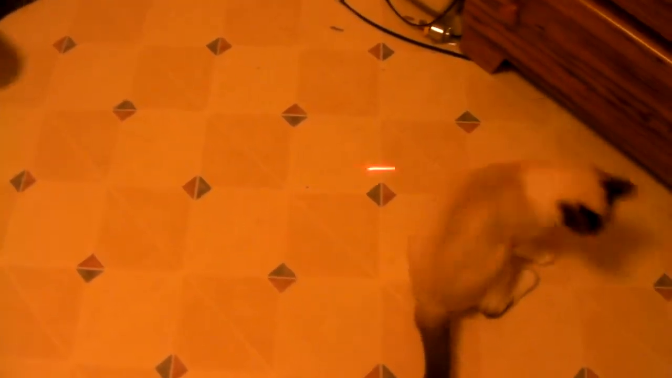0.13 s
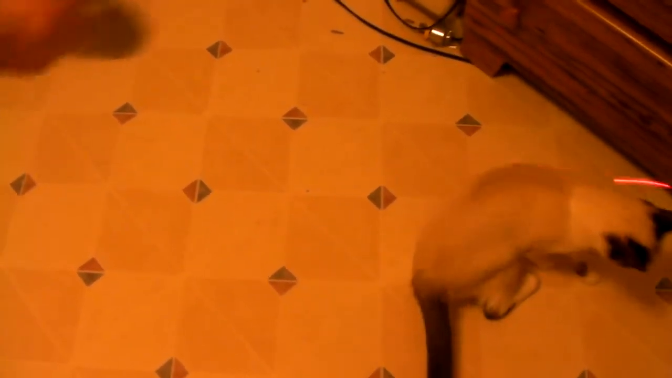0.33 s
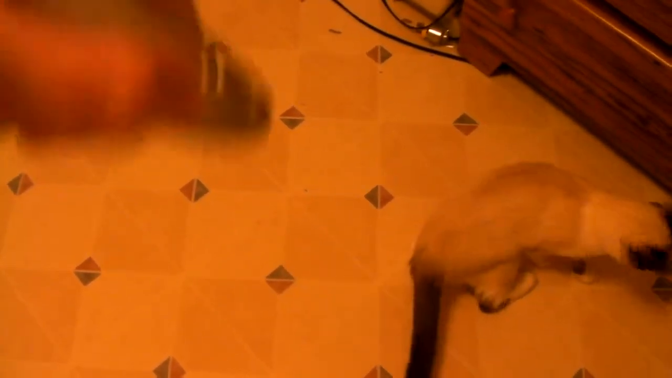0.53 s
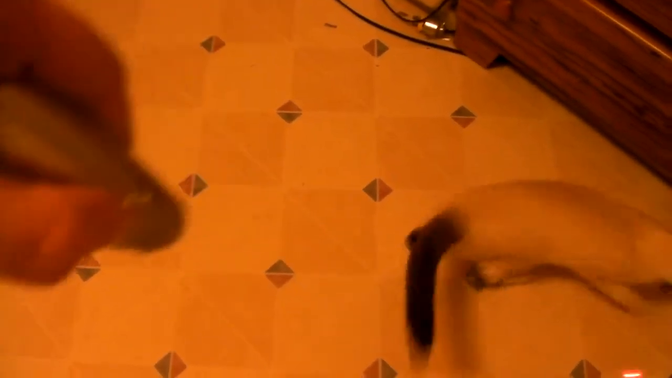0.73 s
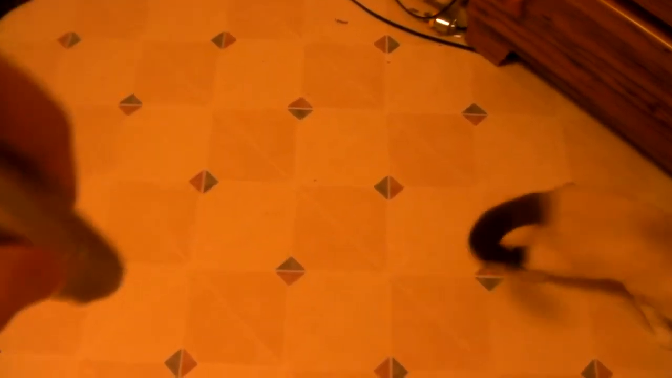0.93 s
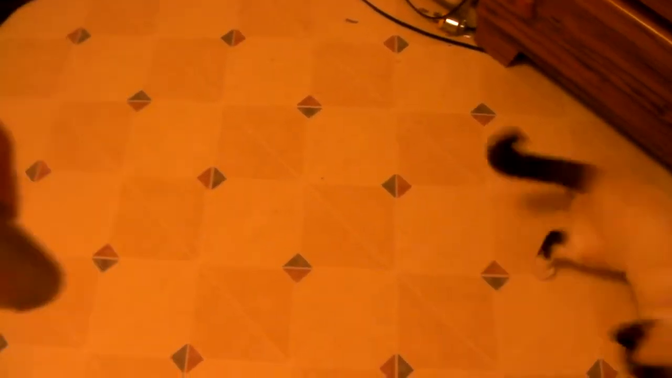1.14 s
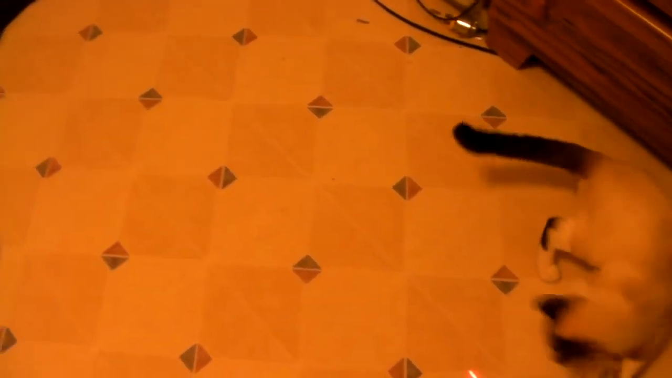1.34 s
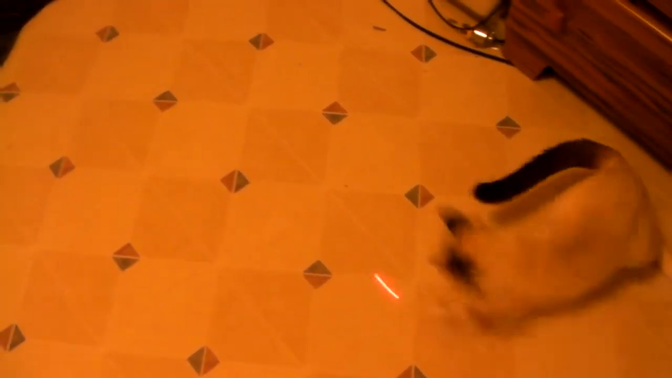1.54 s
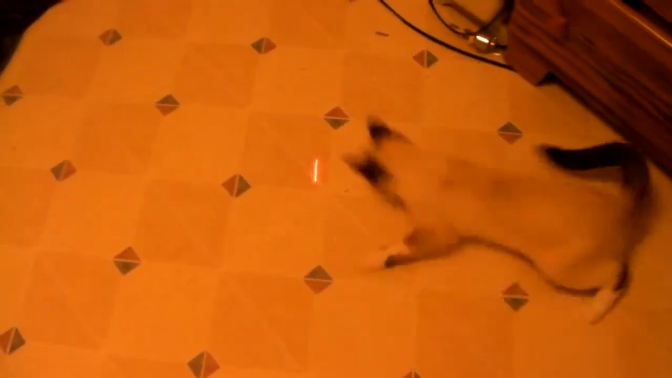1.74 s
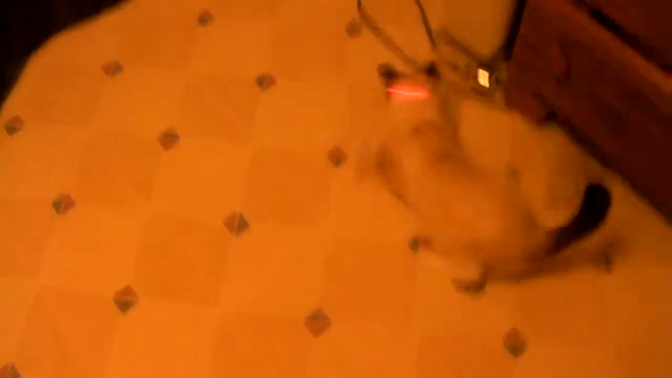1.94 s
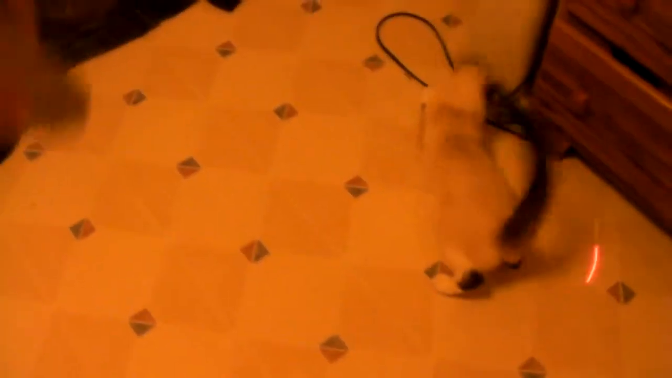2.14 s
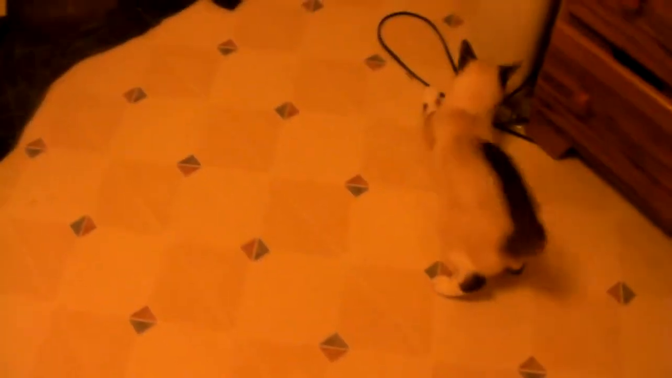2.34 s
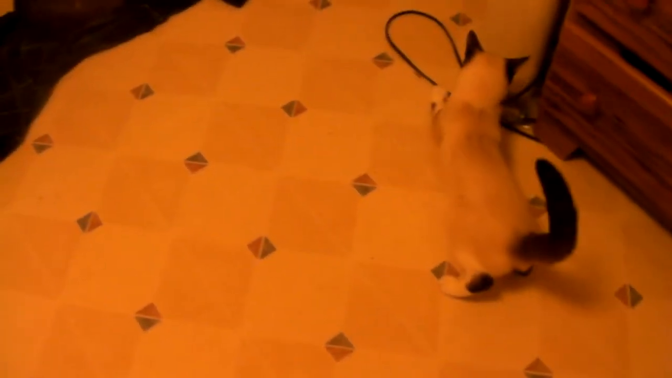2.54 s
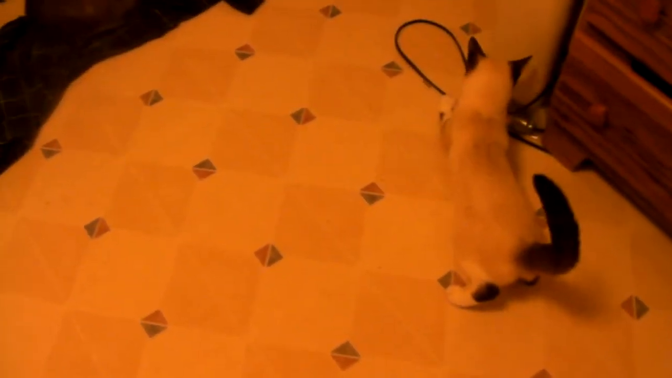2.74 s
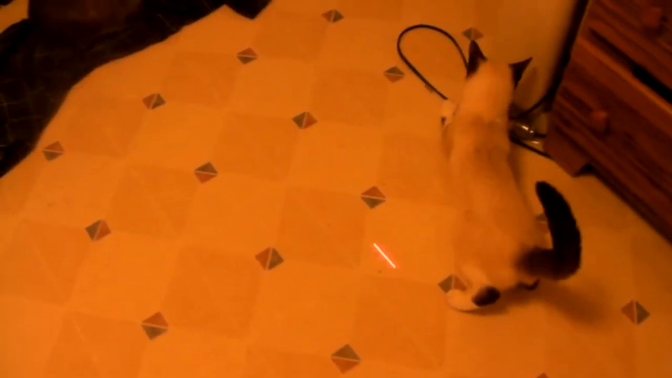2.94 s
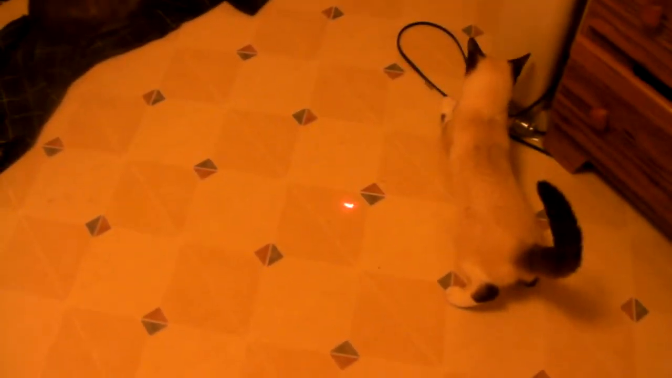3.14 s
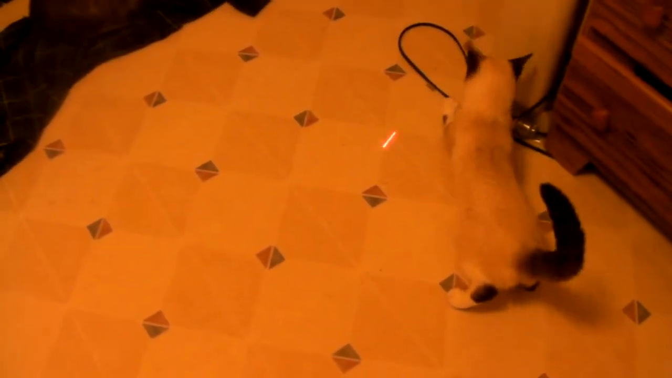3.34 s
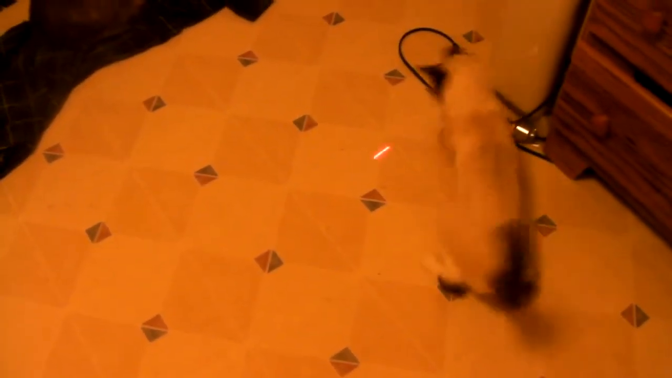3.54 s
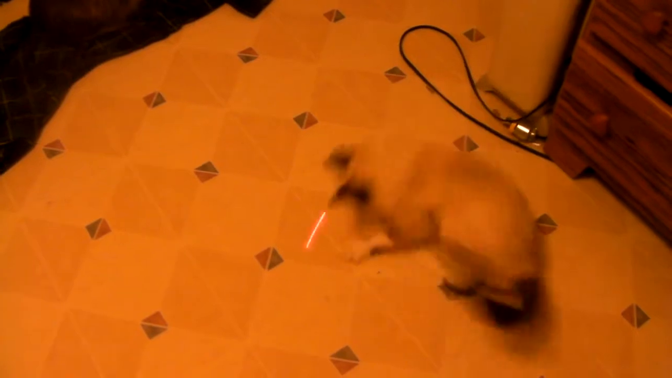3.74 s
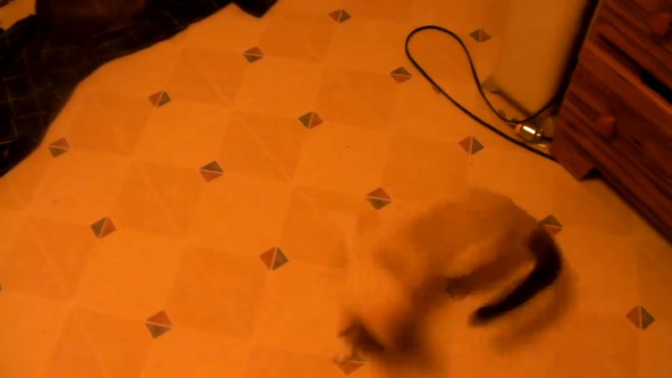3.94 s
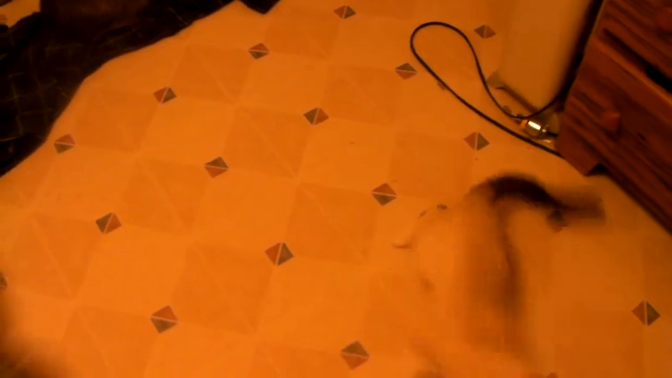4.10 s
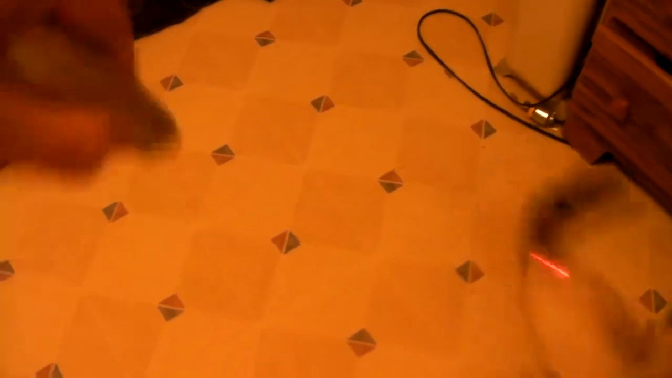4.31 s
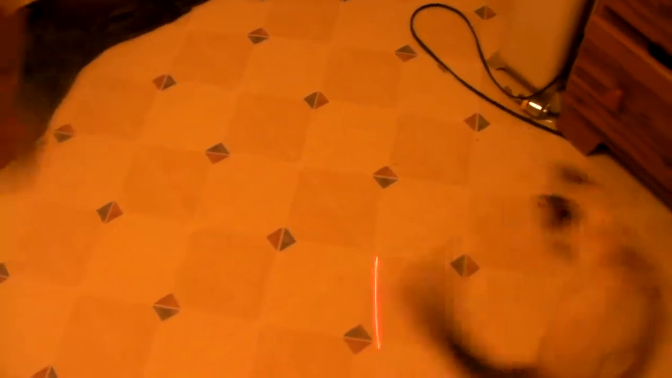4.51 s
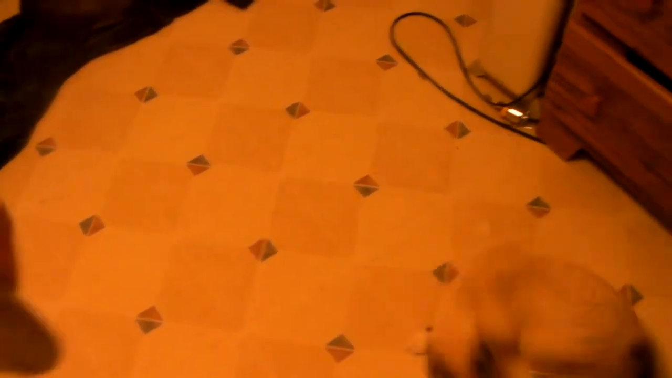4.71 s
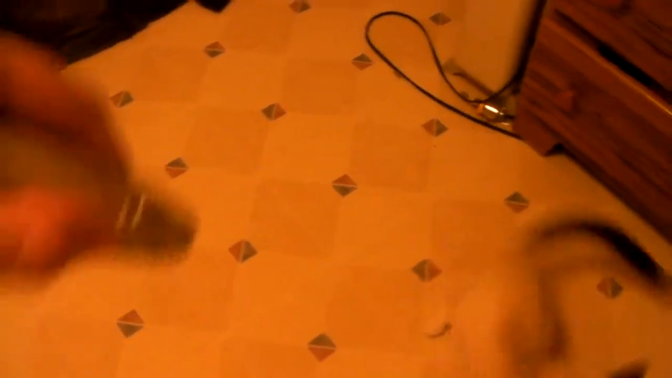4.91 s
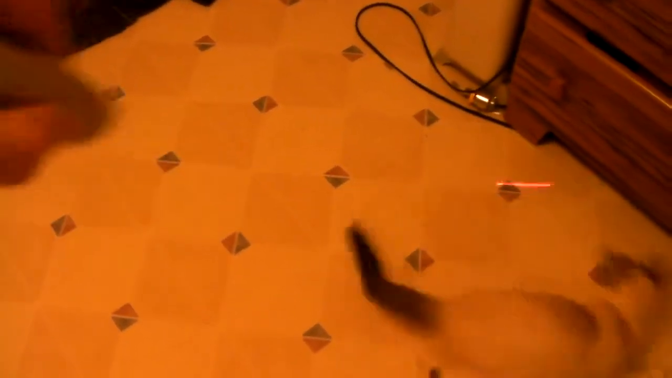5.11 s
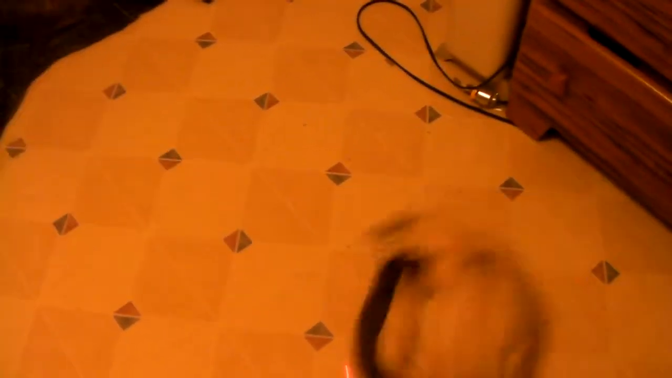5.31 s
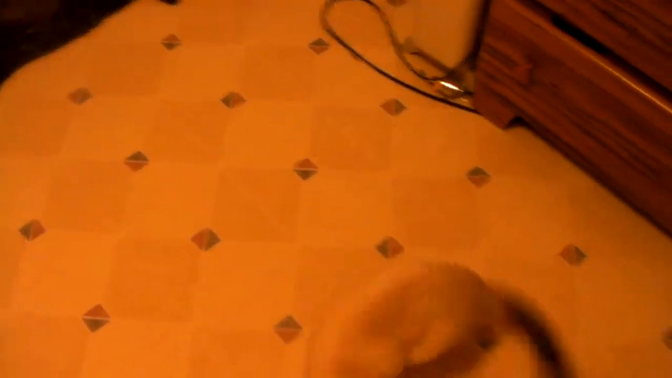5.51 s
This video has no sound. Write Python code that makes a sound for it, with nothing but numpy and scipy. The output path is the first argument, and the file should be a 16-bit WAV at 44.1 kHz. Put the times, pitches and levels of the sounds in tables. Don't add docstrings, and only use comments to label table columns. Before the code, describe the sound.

Close stereo pickup in a small indoor room with low rumble and light hiss. Barely audible kitten steps come first, then a quick burst of sharp claw clicks, short skids and wooden thuds. A quieter pause with faint pads follows, before a longer, busier scramble of ticking, scraping and thumping continues to the end.

```python
import sys
import numpy as np
from scipy import signal
from scipy.fft import rfft, irfft, next_fast_len
from scipy.io import wavfile
from scipy.ndimage import uniform_filter1d

SR = 44100
rng = np.random.default_rng(int(sys.argv[2]) if len(sys.argv) > 2 else 0)


def unload_audio(sound):
    columns = np.transpose(np.atleast_2d(sound))
    steps = np.round(np.clip(columns, -1, 1) * 32767)
    wavfile.write(sys.argv[1], SR, steps.astype(np.int16))


def volts_from_db(level):
    exponent = np.asarray(level, float) / 20
    return 10 ** exponent


N = 245195


def evened(x):
    return x / np.sqrt(np.mean(x ** 2) + 1e-20)


def read(points, hz):
    f, value = np.transpose(points)
    return np.interp(np.log(hz + 1), np.log(f + 1), value)


def add(mix, s, sound):
    part = mix[..., round(s * SR):][..., :sound.shape[-1]]
    part += sound[..., :part.shape[-1]]


def coloured(x, gain):
    size = next_fast_len(x.shape[-1] // 2 + 1) * 2
    spectrum = rfft(x, size) * gain(np.fft.rfftfreq(size, 1 / SR))
    return irfft(spectrum, size)[..., :x.shape[-1]]


def paired(two, likeness):
    same = lambda hz: np.clip(read(likeness, hz), 0, 1)
    shared = coloured(two[0], same)
    own = coloured(two[1], lambda hz: np.sqrt(1 - same(hz) ** 2))
    return np.array([two[0], shared + own])


def stir():
    rest_db, lag_s, share_db = -1.5, 0.043, 40
    t = np.arange(0, N / SR, .005)
    landings = np.array(LANDINGS)
    late = np.maximum(t - landings[:, :1], 0) / lag_s
    swells = volts_from_db(landings[:, 1:2] + share_db) * late * np.exp(1 - late)
    return np.interp(np.arange(N) / SR, t, volts_from_db(rest_db) + swells.sum(0))


# [f/Hz, level/dB per Hz]
AIR_COLOUR = [(12, -62), (20, -19), (43, -17.5), (63, -7.5), (117, -5), (273, -10.5), (404, -3.5),
              (440, -3), (1020, -14.5), (1510, -14.5), (1740, -19), (2440, -19.5), (2810, -19.5),
              (13600, -25), (16500, -24)]
# [f/Hz, likeness]
AIR_LIKENESS = [(60, 0.53), (180, 0.4), (550, 0.56), (1650, 0.28), (4970, -0.49), (15000, 0.16)]
# [f/Hz, width/Hz, level/dB]
HUMS = [
    (404, 39, -82),
    (1462, 4.3, -85),
    (2443, 61, -85.5),
]
# [t/s, level/dB]
WHINE_SWELL = [
    (0, 1.5),
    (.88, 1.5),
    (.94, 12),
    (1.0, 6),
    (1.05, 18),
    (1.1, 0),
    (1.4, 5),
    (5.56, 6),
]


def air():
    noise = paired(rng.standard_normal((2, N)), AIR_LIKENESS)
    low = lambda hz: 1 / (1 + (hz / 1100) ** 4)
    shape = lambda hz: volts_from_db(read(AIR_COLOUR, hz))
    scale = volts_from_db(-63) / np.sqrt(np.mean(coloured(noise, shape) ** 2))
    wander = uniform_filter1d(uniform_filter1d(rng.standard_normal(N), 1500), 1500)
    drift = stir() * volts_from_db(1.8 * evened(wander))
    rumble = drift * coloured(noise, lambda hz: shape(hz) * low(hz))
    hiss = coloured(noise, lambda hz: shape(hz) * (1 - low(hz)))
    out = scale * (rumble + hiss)
    swell = volts_from_db(np.interp(np.arange(N) / SR, *np.transpose(WHINE_SWELL)))
    for (centre, width, db), slow in zip(HUMS, [1, 1, swell]):
        hum = coloured(noise, lambda hz: 1 / (1 + (2 * (hz - centre) / width) ** 2))
        out += volts_from_db(db) * slow * evened(hum)
    return out


# [f/Hz, t60/s]
ROOM_DECAY = [(300, 0.1), (790, 0.55), (2090, 0.21), (5510, 0.19), (14600, 0.24)]
# [t/s, level/dB]
ECHOES = [
    (.0019, -18),
    (.0043, -12.5),
    (.0068, -11.5),
    (0.0148, -22),
    (0.0144, -12),
    (.021, -15),
]
# [f/Hz, likeness]
ROOM_LIKENESS = [(200, 0.89), (2000, 0.84), (5000, 0.66), (10000, 0.12)]


def tail(build_s=0.00084):
    taps = np.zeros((2, 22050))
    at = np.arange(80, 22000, 20) + rng.integers(0, 20, (2, 1096))
    np.put_along_axis(taps, at, rng.choice([-1., 1.], at.shape), 1)
    hz, t, z = signal.stft(paired(taps, ROOM_LIKENESS), SR, nperseg=256)
    decay = volts_from_db(-60 * t / read(ROOM_DECAY, hz)[:, None])
    late = signal.istft(z * decay, SR, nperseg=256)[1]
    late *= 1 - np.exp(-np.arange(late.shape[1]) / SR / build_s)
    late *= volts_from_db(-2.5) / np.linalg.norm(late[0])
    for (s, db), (shift, sign) in zip(ECHOES, rng.random((len(ECHOES), 2))):
        late[:, round(s * SR * (.85 + .3 * shift))] += volts_from_db(db) * np.sign(sign - .5)
    return late


# [t/s, level/dB, lead-in/s, slide/s]
SKIDS = [(1.45, -56.5, .02, 0.05), (1.636, -52, 0.1, .12), (1.742, -35.5, 0.032, .14),
         (1.87, -32.5, 0.018, 0.092), (1.925, -38.5, 0.012, 0.069), (2.018, -31, 0.022, .1),
         (3.64, -53.5, 0.058, .2), (3.8, -53, 0.41, 0.087), (3.841, -32.5, 0.016, 0.065),
         (3.9, -44.5, 0.028, 0.16), (4.05, -47, 0.052, 0.11), (4.101, -36, .022, 0.087),
         (4.331, -29.5, 0.018, 0.027), (4.361, -33, .008, 0.083), (4.632, -33.5, 0.033, .07),
         (4.7, -51.5, .05, 0.12), (4.91, -40.5, .03, 0.16), (4.89, -52, 0.18, 0.11),
         (5.05, -55, 0.14, 0.39), (5.11, -47, 0.085, .04), (5.26, -38.5, 0.016, 0.037),
         (5.44, -40, 0.19, 0.12), (5.55, -44.5, 0.14, 0.2)]
# [f/Hz, level/dB per Hz]
SKID_COLOUR = [(410, -31), (700, -16.5), (1370, -6.5), (3240, -4.5), (4950, -3.5), (8630, -10),
               (15000, -19), (15900, -28), (16500, -59)]


def skids(per_s=5000, spread_db=4.5):
    t = np.arange(0, N / SR, .001)
    level = np.zeros(len(t))
    for s, db, lead, slide in SKIDS:
        away = np.maximum((s - t) / lead, (t - s) / slide)
        level = np.maximum(level, volts_from_db(db - 20 * away))
    size = volts_from_db(spread_db * np.minimum(rng.exponential(1, (2, N)), 4))
    slips = size * (rng.random((2, N)) < per_s / SR) * rng.choice([-1, 1], (2, N))
    scrape = coloured(paired(slips, ROOM_LIKENESS), lambda hz: volts_from_db(read(SKID_COLOUR, hz)))
    return volts_from_db(-5) * evened(scrape) * np.interp(np.arange(N) / SR, t, level)


def ringing(main_hz, fixed_hz, fixed_db, crowd, t60, travel, dull_db, luck):
    t = np.arange(11000) / SR
    place, weight, phase = luck.T[:, :, None]
    step = (np.arange(len(luck))[:, None] + place) / len(luck)
    hz = crowd[0][0] * (crowd[-1][0] / crowd[0][0]) ** step
    db = read(crowd, hz) + 4.9 * (weight - .5) - dull_db * np.log2(np.maximum(hz / 600, 1))
    hz[0], db[0] = main_hz, 0
    hz[1], db[1] = fixed_hz * (0.95 + 0.0678 * place[1]), fixed_db
    rise = (1 - np.exp(-t * hz / travel)) ** 2
    fade_db = 60 * t / t60 * (hz / fixed_hz) ** 0.12
    modes = volts_from_db(db - fade_db) * rise * np.sin(2 * np.pi * (hz * t + phase))
    sound = modes.sum(0)
    return sound / abs(sound).max()


# [f/Hz, level/dB]
JOISTS = [(32, -11), (60, -14.5), (130, -8.5), (200, -5), (270, -8)]
# [f/Hz, level/dB]
BOARDS = [(245, -14.5), (350, -8), (530, -9), (750, -19), (1200, -15), (1700, -17)]
# [t/s, joist level/dB, joist f/Hz, board f/Hz, board level/dB]
LANDINGS = [(1.447, -50.5, 85.5, 557, -50.5), (1.731, -35, 200, 435, -40), (1.788, -39.5, 113, 383.7, -43),
            (1.865, -35, 187.6, 404, -42.5), (2.011, -34.5, 272, 396.8, -26.5), (2.048, -42, 218, 390, -36),
            (3.832, -37, 175.5, 388, -47), (3.864, -65, 111, 373.5, -45), (3.912, -41.5, 87, 462, -49),
            (4.029, -38, 199, 338, -64), (4.099, -52, 180, 426, -47.5), (4.162, -48, 99, 561, -51),
            (4.269, -54, 102, 403.5, -44), (4.325, -36, 265, 328.7, -39), (4.348, -38, 207, 394, -38.5),
            (4.625, -30.5, 204, 405, -37.5), (4.685, -44, 92, 482, -45), (4.719, -55, 95, 381, -44.5),
            (4.794, -45, 152, 397, -55), (4.908, -40, 204, 348.4, -39), (5.124, -41.5, 172, 318, -48),
            (5.26, -46, 87, 397.6, -46), (5.418, -32.5, 182, 453, -39), (5.508, -45, 112, 372, -44)]
# [t/s, joist level/dB, joist f/Hz, board level/dB]
STEPS = [(0.07, -54.5, 154, -82), (0.299, -80, 99, -78), (0.699, -63.5, 215, -62.5), (0.759, -65, 156, -83),
         (0.87, -62, 113, -76), (1.013, -68, 127, -67), (1.268, -60, 190, -82), (1.378, -74, 100, -68),
         (1.489, -53, 91, -65), (1.549, -69, 66, -75), (1.597, -52.5, 168, -75), (1.686, -51, 151, -60.5),
         (1.937, -38, 110, -62), (2.234, -57.5, 179, -81), (2.29, -64, 135, -67), (2.547, -58, 106, -71.5),
         (2.727, -61, 104, -69), (3.022, -75, 107, -69), (3.399, -63, 82.8, -60), (3.53, -56, 177, -62.5),
         (3.621, -64, 144, -64), (3.69, -58, 88, -65.5), (3.761, -41, 94.5, -58), (4.439, -54, 205, -69),
         (5.002, -55, 142, -56.5), (5.199, -53, 107, -65), (5.36, -49, 92.6, -57)]


def paws():
    joist_mode_hz, board_mode_hz = 100, 391
    landing_ring, step_ring, step_board_hz = 0.82, 1, 411.4
    thuds = [(*row, landing_ring) for row in LANDINGS]
    thuds += [(s, db, hz, step_board_hz, board_db, step_ring) for s, db, hz, board_db in STEPS]
    out, luck = np.zeros(N), rng.random((len(thuds), 24, 3))
    for (s, db, joist_hz, board_hz, board_db, ring), draw in zip(sorted(thuds), luck):
        dull_db = max(0.38 * (-24.5 - board_db), 0)
        joist = ringing(joist_hz, joist_mode_hz, -5.5, JOISTS, 0.26 * ring, 0.38, 0, draw[:8])
        board = ringing(board_hz, board_mode_hz, -0.5, BOARDS, 0.28 * ring, 0.96, dull_db, draw[8:])
        add(out, s, volts_from_db(db - 0.5) * joist)
        add(out, s, volts_from_db(board_db + 5.5) * board)
    wet = signal.fftconvolve(out[None], tail(), axes=1)[:, :N]
    return out + volts_from_db(-13) * wet


def tick(db, hz, bright_db, cycles=0.9):
    t = np.arange(160) / SR
    ring = np.sin(2 * np.pi * hz * t) * (t * hz) ** 1.35 * np.exp(-t * hz / cycles * 1.86)
    for _ in range(2):
        ring = ring - uniform_filter1d(ring, size=21, mode="constant")
    ring = ring / abs(ring).max()
    spike = np.diff(np.exp(-.5 * ((np.arange(162) - 8) / 1.41) ** 2), 2)
    spike = spike / abs(spike).max()
    return -volts_from_db(db - 0.5) * (ring - volts_from_db(bright_db + 15.5) * spike)[None]


# [t/s, level/dB, ring f/Hz, brightness level/dB]
STRIKES = [(1.6386, -30.5, 3500, -24), (1.738, -16.5, 3200, -15.5), (1.7569, -19, 3430, -19),
           (1.7663, -12.5, 3340, -23), (1.8715, -11, 3390, -28), (1.922, -25.5, 3420, -5.5),
           (2.0153, -16.5, 4100, -38), (2.022, -21, 2180, -34), (3.7494, -29.5, 2760, -18),
           (3.767, -27, 3520, -26), (3.8372, -14.5, 3140, -20), (3.8408, -16.5, 4440, -22.5),
           (3.852, -24.5, 3160, -20), (3.9083, -27.5, 3570, -14), (4.0433, -29.5, 3640, -15.5),
           (4.1034, -12.5, 3700, -43), (4.3304, -14, 4360, -15), (4.3646, -17, 3930, -6.5),
           (4.376, -20, 4910, -16), (4.3867, -26.5, 3200, -19), (4.6312, -18, 3190, -18),
           (4.6453, -23.5, 4340, -34), (4.9151, -14.5, 3820, -21), (4.927, -28, 3560, -13),
           (5.11, -18, 3800, -11.5), (5.2619, -24.5, 3500, -9.5), (5.3584, -30, 4100, -7),
           (5.4169, -27, 2960, -20), (5.4249, -19, 4250, -17), (5.5077, -31.5, 2400, -13.5)]
# [t/s, level/dB, ring f/Hz, room share level/dB]
GRAZES = [(0.161, -51.5, 4920, 11), (0.9785, -40.5, 4360, 7.5), (1.4507, -34.5, 3600, 2.5),
          (1.5967, -39, 3900, 13.5), (1.883, -36, 3070, 1), (3.5239, -53.5, 3040, 8),
          (3.624, -40, 3780, 10), (3.687, -31, 4530, 3.5), (3.81, -50.5, 3520, 23),
          (3.9488, -36.5, 2980, 4), (4.0924, -32, 3880, -3), (4.2233, -38, 3660, 3),
          (4.3358, -21, 6370, 5.5), (4.5735, -44, 6600, 7), (4.6011, -37.5, 4300, 13.5),
          (4.687, -34, 3220, 4.5), (4.79, -47, 3800, 11), (4.842, -32, 4000, 2.5), (4.945, -35, 3440, -14),
          (5.0178, -38.5, 4760, 17), (5.0832, -40.5, 3900, 11), (5.1337, -36, 3470, 11),
          (5.1917, -41.5, 3000, 12), (5.3077, -33, 4160, -9), (5.3974, -26, 4930, 7),
          (5.5448, -28.5, 4100, 10)]


def claws():
    graze_bright_db, bounce_cycles, bounce_db = -17, 3.4, -17
    out, rooms = np.zeros((2, N)), [tail() for _ in range(5)]
    ticks = [(s, db, hz, bright_db, 0.06 - 0.1252 * db) for s, db, hz, bright_db in STRIKES]
    ticks += [(s, db, hz, graze_bright_db, room_db) for s, db, hz, room_db in GRAZES]
    for k, (s, db, hz, bright_db, room_db) in enumerate(sorted(ticks)):
        s = s + .0005
        direct = np.pad(tick(db, hz, bright_db), ((0, 0), (0, 100)))
        direct = direct + volts_from_db(bounce_db) * np.roll(direct, round(bounce_cycles / hz * SR))
        add(out, s, direct)
        wet = signal.fftconvolve(direct, rooms[k % len(rooms)], axes=1)
        add(out, s, volts_from_db(room_db - 5.0) * wet)
    return out


# [f/Hz, left-right level/dB]
PORT_TILT = [(25, 8), (125, 2.3), (500, 0.5), (4000, -0.1), (8000, -0.5), (15000, -1.2)]


def ported(x):
    lag = 0.94

    def port(side, sign):
        tilt = lambda hz: volts_from_db(sign * read(PORT_TILT, hz) / 2)
        delay = lambda hz: np.exp(-1j * np.pi * sign * lag * hz / SR)
        return coloured(side, lambda hz: tilt(hz) * delay(hz))

    return np.array([port(x[0], 1), port(x[1], -1)])


def scene():
    return ported(claws() + paws() + skids()) + air()


def low_pass(x):
    return signal.sosfilt(signal.butter(12, 16810, fs=SR, output="sos"), x)


def record(dry):
    notch = lambda hz: 1 - .95 * np.exp(-.5 * ((hz - 7900) / 110) ** 2)
    edge = lambda hz: volts_from_db(-24) + (1 - volts_from_db(-24)) / (1 + (hz / 15850) ** 120)
    mix = coloured(dry, lambda hz: notch(hz) * edge(hz))
    return low_pass(mix)


dry = scene()
out = record(dry)
unload_audio(out)
```